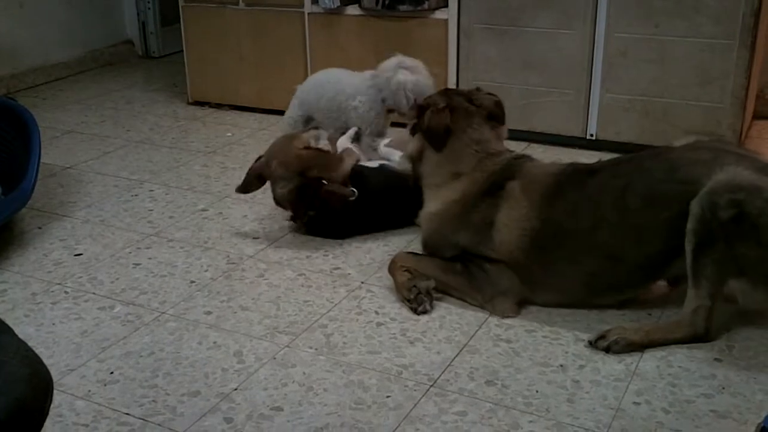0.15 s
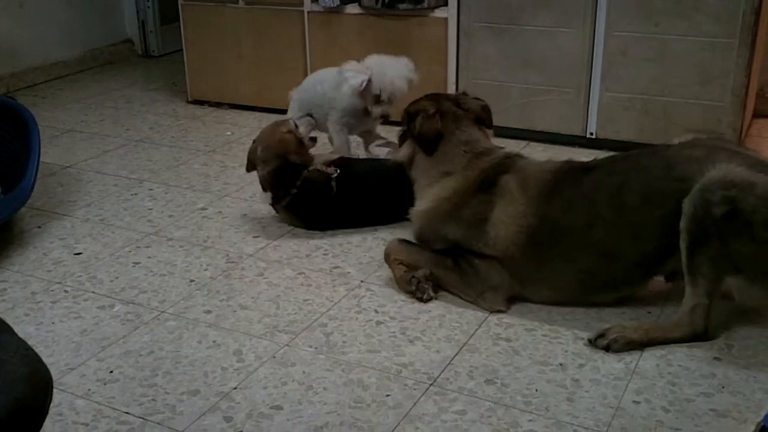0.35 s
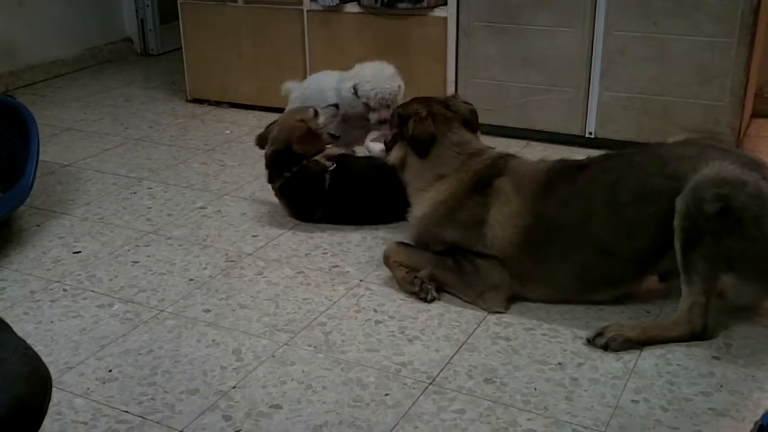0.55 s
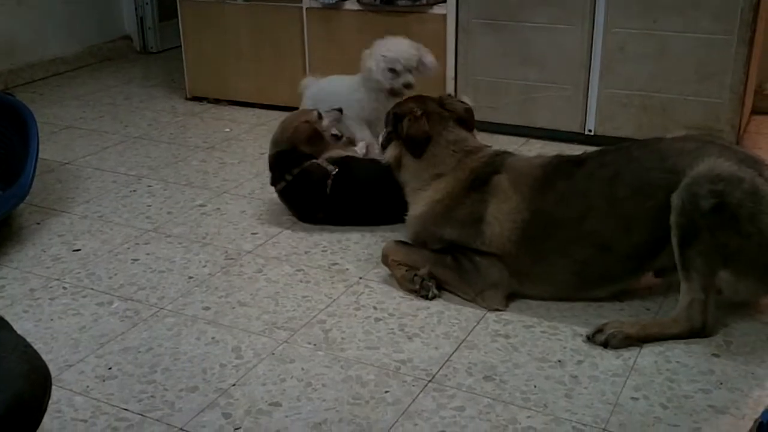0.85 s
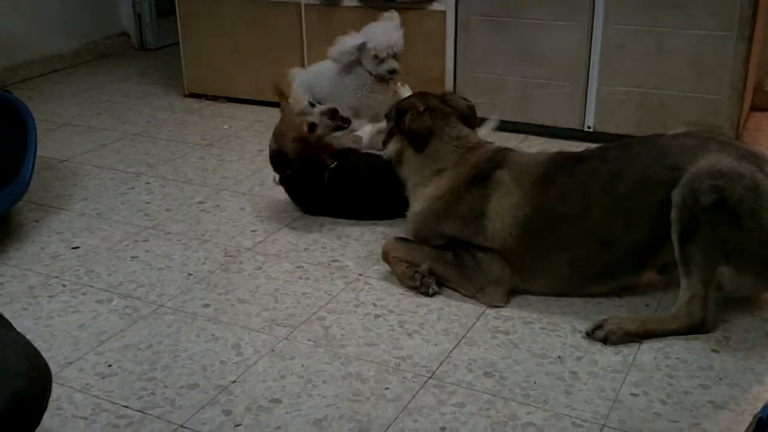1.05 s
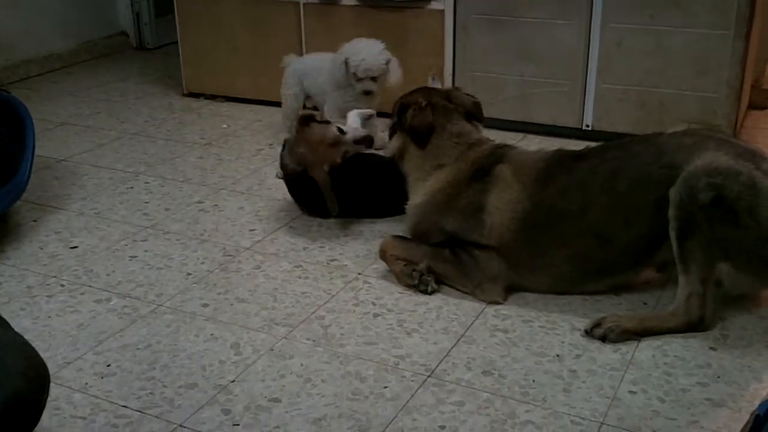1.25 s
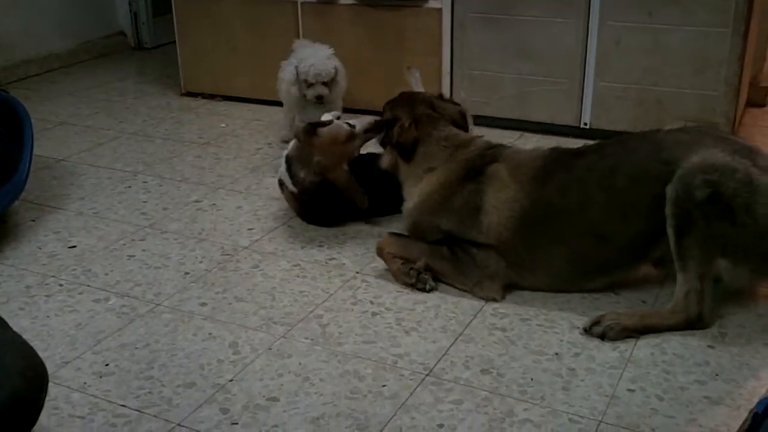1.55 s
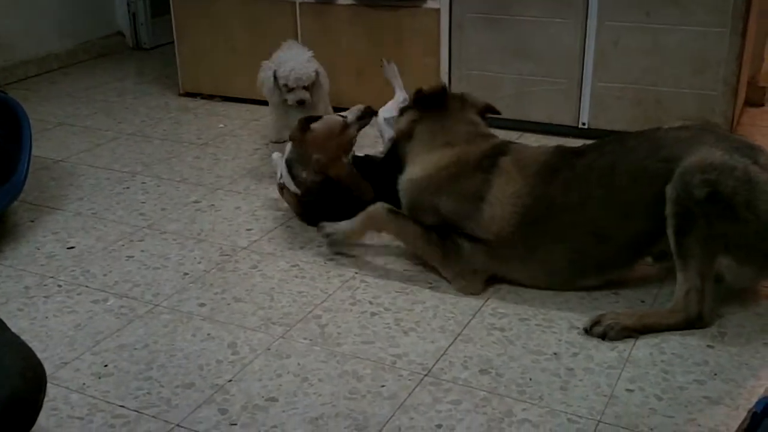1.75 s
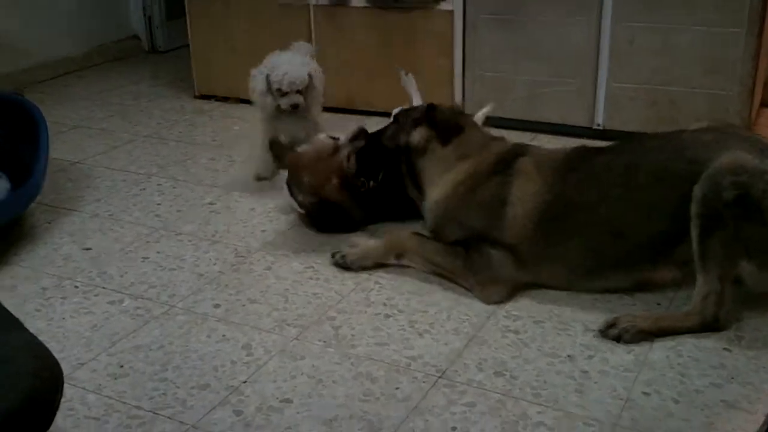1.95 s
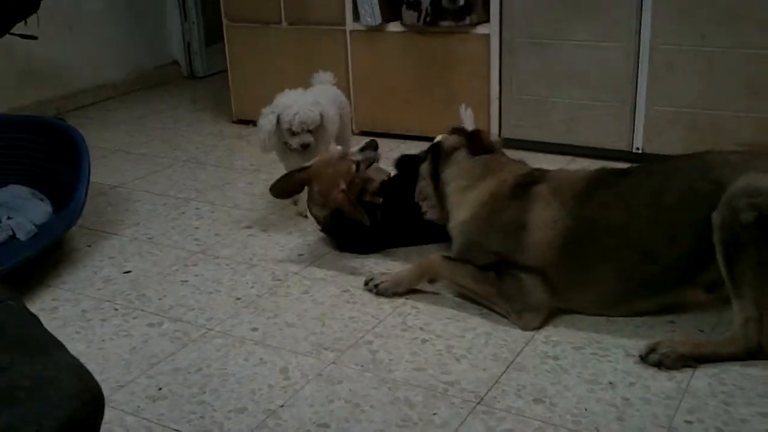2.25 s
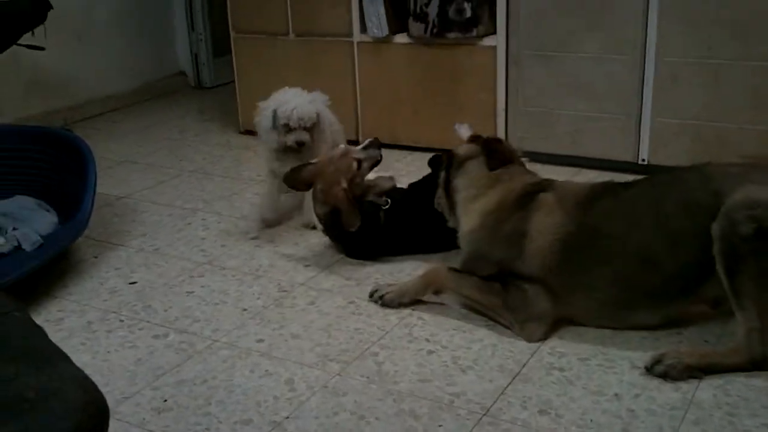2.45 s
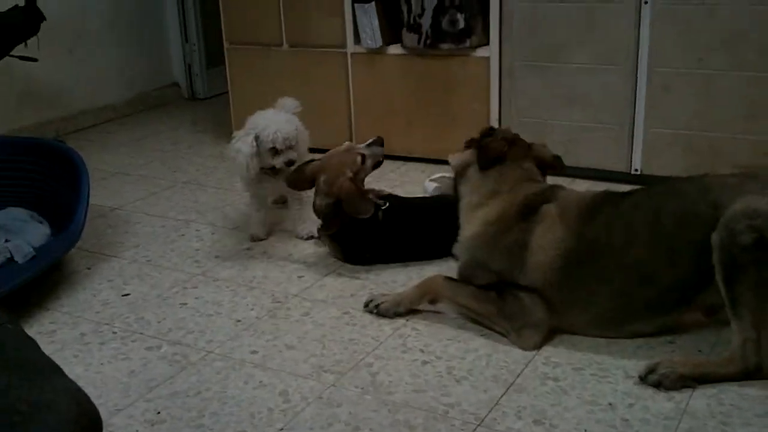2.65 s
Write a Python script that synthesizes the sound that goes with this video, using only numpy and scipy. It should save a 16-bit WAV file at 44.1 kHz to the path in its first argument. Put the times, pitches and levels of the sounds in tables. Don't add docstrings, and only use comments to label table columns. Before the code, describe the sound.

A metal collar tag jingles and claws tick as dogs wrestle, then a rumbling growl rises and a shorter, higher growl ends in a snort; small hard room, close hand-held microphone with rumble and faint hiss.

```python
import sys
import numpy as np
from scipy import signal
from scipy.fft import rfft, irfft, next_fast_len
from scipy.io import wavfile
from scipy.ndimage import uniform_filter1d, map_coordinates

SR = 44100
rng = np.random.default_rng(int(sys.argv[2]) if len(sys.argv) > 2 else 0)


def elevation(decibels):
    levels = np.asarray(decibels, float)
    return 10 ** (levels / 20)


def put_to_file(sound):
    columns = np.atleast_2d(sound).T
    safe = np.clip(columns, -1, 1)
    whole_steps = np.round(safe * 32767)
    wavfile.write(sys.argv[1], SR, whole_steps.astype(np.int16))


N = 123479
T = np.arange(N) / SR
SHORT = np.arange(SR // 5) / SR


def unit(x):
    return x / np.sqrt(np.mean(x ** 2) + 1e-20)


def along(points, hz):
    f, v = np.transpose(points)
    return np.interp(np.log(hz + 1), np.log(f + 1), v)


def wobble(rate_hz):
    knots = rng.standard_normal(int(N * rate_hz / SR) + 4)
    return map_coordinates(knots, [T * rate_hz])


def filtered(x, response):
    m = next_fast_len(N + SR // 2)
    return irfft(rfft(x, m) * response(np.fft.rfftfreq(m, 1 / SR)), m)[:N]


def coloured(x, spectrum):
    return filtered(x, lambda hz: elevation(along(spectrum, hz)))


def noise(spectrum):
    lowest_hz = spectrum[0][0] / 2
    return unit(filtered(rng.standard_normal(N), lambda hz: elevation(along(spectrum, hz)) * (hz > lowest_hz)))


def swell(start_s, length_s, power):
    return np.sin(np.pi * np.clip((T - start_s) / length_s, 0, 1) ** power)


def add(out, start_s, piece):
    out[round(start_s * SR):][:len(piece)] += piece


def room(x, wet_db):
    # hz, t60_s
    decay = [(150, 0.24), (800, 0.31), (4000, 0.35), (12000, 0.18)]
    hz, t, z = signal.stft(rng.standard_normal(SR // 2), SR, nperseg=256)
    tail = signal.istft(z * elevation(-60 * t / along(decay, hz)[:, None]), SR, nperseg=256)[1]
    delayed = np.pad(x, (200, 0))
    return x + elevation(wet_db) * signal.fftconvolve(delayed, tail / np.linalg.norm(tail))[:N]


def air():
    # hz, level_db
    spectrum = [(100, -5), (250, -7.5), (500, -8.5), (900, -7), (2000, -15), (4500, -21), (9000, -26.5),
                (15000, -26)]
    level_db, patch_db = -50.5, 1.08
    z = signal.stft(noise(spectrum), nperseg=512)[2]
    patches = uniform_filter1d(uniform_filter1d(rng.standard_normal(z.shape), 8, 0), 12, 1)
    hiss = signal.istft(z * elevation(patch_db * unit(patches)), nperseg=512)[1][:N]
    return elevation(level_db) * unit(hiss)


def handling():
    # time_s, level_db
    bumps = [
        (0, -31),
        (.3, -40),
        (.5, -41.5),
        (.7, -38),
        (1.2, -38.5),
        (1.55, -37),
        (1.72, -31),
        (2.1, -38.5),
        (2.56, -34),
        (2.72, -41.5),
    ]
    # hz, level_db
    rumble = [(15, -8), (22, 3.5), (55, -2), (90, -8), (160, -22), (300, -30), (500, -75)]
    s, level_db = np.transpose(bumps)
    return elevation(np.interp(T, s, level_db)) * unit(elevation(2.36 * wobble(16)) * noise(rumble))


def thumps():
    # centre_s, signed_size, half_width_s, recoil_share
    landings = [(.114, -0.039, 0.008, 0.45), (0.166, -0.054, 0.0075, 0.48), (.359, 0.06, 0.001, 0.68),
                (0.369, -0.053, 0.0056, 0.64), (.552, -0.041, 0.0036, 0.43), (0.641, 0.057, 0.0048, 0.75),
                (.905, -0.074, 0.0021, 0.31), (0.917, 0.068, 0.00212, 1), (1.075, 0.054, 0.0049, 0.77),
                (1.251, -0.078, 0.0027, .7), (1.267, -0.055, 0.0061, 0.51), (1.297, -0.071, 0.00254, 1.1),
                (1.323, .2, 0.0022, 0.84), (1.588, -.065, 0.0078, 0.98), (1.804, 0.041, 0.0065, 1.14),
                (2.013, -.12, 0.003, 0.14), (2.016, -0.18, 0.0011, 0.079), (2.031, -0.11, 0.0055, .8),
                (2.158, 0.049, 0.0033, 0.56), (2.481, -0.14, 0.00146, 0.12), (2.487, -0.18, 0.0012, 0.12),
                (2.504, -0.14, 0.0044, 0.33)]
    recoil_half_widths, shape_power = 2.22, 1.57
    t = np.arange(-1700, 1900) / SR
    out = np.zeros(N)

    def lobe(u):
        return np.exp(-np.abs(u) ** shape_power)

    for s, size, half_s, recoil in landings:
        push = lobe(t / half_s) - recoil * lobe(t / half_s - recoil_half_widths)
        add(out, s + t[0], size * push)
    return out


def claws():
    # start_s, peak_db, brightness_0_1
    clicks = [
        (0.16, -56.5, 0.3),
        (0.17, -56, 0.4),
        (0.4558, -49, 0.75),
        (0.4637, -51, 0.6),
        (0.7589, -46, 0.8),
        (0.849, -51.5, 0.75),
        (0.876, -51, 0.65),
        (1.7622, -36.5, 0.56),
        (1.7738, -49, 0.8),
        (1.84, -54, 0.5),
    ]
    # hz, level_db
    dull_curve = [(1500, -25), (3000, -1.5), (4500, 3.5), (7000, -3), (15000, -20)]
    # hz, level_db
    bright_curve = [(4000, -22.5), (8000, -4.5), (12000, -2), (15000, -1)]
    gain_db, t60_s, snap = 14.5, 0.0061, 3.36
    dull, bright = np.zeros(N), np.zeros(N)
    for s, db, share in clicks:
        scrape = rng.standard_normal(len(SHORT))
        tick = elevation(db + gain_db - 60 * SHORT / t60_s) * (scrape + snap * (SHORT == 0))
        add(dull, s, (1 - share) * tick)
        add(bright, s, share * tick)
    return 2 * (coloured(dull, dull_curve) + coloured(bright, bright_curve))


def tag():
    # start_s, peak_db, high_modes_db, second_mode_db, free_ringing_s
    contacts = [(0.188, -58, -15, 5, 0.033), (0.498, -50, -15, -3, 0.029), (0.5276, -39.5, -16, -10, 0.044),
                (0.5594, -34, -10, -7, 0.04), (0.6139, -53, -15, -10, 0.014), (0.6405, -52, -15, -9, 0.018),
                (0.6889, -38.5, -21, -10, 0.018), (0.7452, -42, -10, -6, 0.013),
                (0.798, -49.5, -9, -4, 0.041), (0.828, -49, -10, -8, 0.037), (0.8977, -49, -13, 2, 0.013),
                (0.9198, -47.5, -15, -5, 0.0076), (0.9422, -54, -18, 13, .012),
                (1.0302, -39, -19, -6, 0.0091), (1.041, -37.5, -22, -12, 0.029),
                (1.075, -47, -15, -1, 0.023), (1.11, -45, -17, -8, 0.014),
                (1.1428, -38.5, -11.5, -4, 0.039), (1.1937, -42.5, -15, -10, 0.04),
                (1.237, -45.5, -27, -14, 0.0088), (1.27, -62, -27, -7, 0.035), (1.346, -55, -27, -3, 0.058),
                (1.3874, -57, -27, -10, 0.013)]
    mode_hz = np.array([4635, 4935, 4540, 11250, 11995, 12075])[:, None]
    mode_db = np.array([1, -0.5, -4.5, -1, -3, 1])[:, None]
    mode_t60_s = np.array([0.22, 0.11, 0.05, .15, 0.17, 0.32])[:, None]
    # hz, level_db
    tick_curve = [(3500, -23), (5500, 1), (7000, -7.5), (9000, -20)]
    gain_db, scatter_db, attack_s, fur_t60_s = -1, 1, 0.0025, 0.019
    tick_db, tick_t60_s, chatter_db = -6.5, 0.059, 2
    modes = len(mode_hz)
    ring = elevation(mode_db - 60 * SHORT / mode_t60_s) * np.exp(2j * np.pi * mode_hz * SHORT)
    ring = ring * (1 - np.exp(-SHORT / attack_s))
    out, ticks = np.zeros(N), np.zeros(N)
    for s, db, high_db, second_db, free_s in contacts:
        share_db = np.array([0, second_db, 0, high_db, high_db, high_db])
        strike_db = db + gain_db + share_db + rng.normal(0, scatter_db, modes)
        strike = elevation(strike_db) * np.exp(2j * np.pi * rng.random(modes))
        damping = elevation(-60 * np.clip(SHORT - free_s, 0, 1) / fur_t60_s)
        add(out, s, (strike @ ring).real * damping)
        add(ticks, s, elevation(db + tick_db - 60 * SHORT / tick_t60_s))
    return out * elevation(chatter_db * wobble(150)) + ticks * noise(tick_curve)


def throat(x, peaks):
    floor_hz = 226

    def response(f):
        total = 0
        for k, (centre, width, db) in enumerate(peaks):
            peak = 1j * f * width / (centre * centre - f * f + 1j * f * width)
            total = total + (-1) ** k * elevation(db) * peak
        return (1j * f / (floor_hz + 1j * f)) ** 2 * total

    return unit(filtered(x, response))


def wheezes():
    # start_s, length_s, level_db, cavity_hz, width_hz
    breaths = [(0.271, 0.087, -47, 4500, 900), (1.0, 0.096, -53, 750, 220), (1.3, 0.14, -47, 1094, 30),
               (1.84, 0.041, -57.5, 4600, 400), (2.65, 0.072, -52, 720, 200), (1.62, .035, -55, 3400, 150),
               (1.658, 0.042, -56, 3750, 220), (1.66, 0.079, -50, 1500, 130),
               (1.765, 0.056, -54.5, 4700, 640), (1.94, 0.027, -62, 3200, 166),
               (1.933, 0.043, -53, 1750, 130), (1.945, 0.034, -34, 1080, 86), (2.386, 0.058, -41, 1870, 92),
               (2.375, 0.093, -48, 3070, 300), (2.39, 0.064, -51, 4500, 460), (2.25, 0.26, -57, 6200, 940),
               (2.25, 0.091, -48, 2180, 150), (2.649, 0.065, -57, 2200, 200),
               (2.638, 0.063, -64, 4300, 740)]
    breath = rng.standard_normal(N) * elevation(2.0 * wobble(60))
    out = np.zeros(N)
    for s, length_s, db, hz, width_hz in breaths:
        out += elevation(db) * swell(s, length_s, 0.73) * throat(breath, [(hz, width_hz, 0)])
    return out


def snorts():
    # start_s, length_s, level_db, brightness_0_1
    puffs = [
        (0.158, 0.039, -71, .6),
        (0.227, 0.13, -44.5, 1),
        (0.344, 0.066, -54.5, 1),
        (0.762, 0.039, -55.5, 0.03),
        (0.993, 0.1, -56.5, 0.03),
        (1.59, 0.085, -50, 0.3),
        (1.948, 0.015, -51, 0),
        (2.38, 0.1, -38, 0.12),
        (2.63, 0.097, -51.5, 0),
    ]
    # hz, level_db
    dull_curve = [(400, -26), (900, 6.5), (2000, 1), (4000, -12.5), (8000, -40), (15000, -44)]
    # hz, level_db
    bright_curve = [(800, -29), (2000, 6.5), (4200, 9), (7000, 6), (11000, 7), (15000, -2)]
    dull, bright, out = noise(dull_curve), noise(bright_curve), np.zeros(N)
    for s, length_s, db, share in puffs:
        out += elevation(db) * swell(s, length_s, 0.93) * ((1 - share) * dull + share * bright)
    return out * elevation(2.2 * wobble(70))


def growl(rows, chest_db, support, shut, wide):
    # hz, level_db
    rasp_curve = [(1000, -32), (1800, 4), (3600, -19), (6500, -13), (15000, -21)]
    jitter, size_scatter_db, open_share, fade_s = 0.05, 1, 1, 0.0061
    rasp_db, chest_follows = -21, 0.37
    s, *columns = np.transpose(rows)
    pitch_hz, level_db, rough, opening = [np.interp(T, s, c) for c in columns]

    turns = np.cumsum(pitch_hz * (1 + jitter * rough * wobble(60))) / SR
    cycle = turns.astype(int)
    size = elevation(size_scatter_db * rng.standard_normal(size=400))[cycle]
    pulses = unit(size * np.diff(cycle, prepend=0))
    gated = unit(size * (0.43 + np.exp(-(turns % 1) / open_share)) * rng.standard_normal(N))
    source = np.sqrt(1 - rough) * pulses + np.sqrt(rough) * gated

    voice = (1 - opening) * throat(source, shut) + opening * throat(source, wide)
    rasp = unit(coloured(gated + rng.standard_normal(N), rasp_curve))
    voice = voice + elevation(rasp_db) * rasp

    chest = np.zeros(N)
    for k, db in enumerate(chest_db):
        tone = np.sin(2 * np.pi * ((k + 1) * turns + rng.random()))
        chest += elevation(db + 3.3 * wobble(25.14)) * tone
    steadying_db = (1 - chest_follows) * (level_db.max() - level_db)
    chest = chest * elevation(steadying_db + np.interp(T, *np.transpose(support)))

    gate = np.clip(np.minimum(T - s[0], s[-1] - T) / fade_s, 0, 1)
    return gate * elevation(level_db) * (voice + chest)


def long_growl():
    # time_s, pitch_hz, level_db, roughness_0_1, mouth_opening_0_1
    course = [
        (1.29, 55.9, -48, 0.63, 0.84),
        (1.35, 58.58, -37, 0.42, 0.48),
        (1.46, 65.31, -34.5, 0.44, 0.48),
        (1.56, 68.04, -38, 0.53, 0.13),
        (1.65, 75.47, -35, 0.48, 0),
        (1.74, 74.38, -36.5, .3, 0.61),
        (1.81, 73.5, -45.5, 0.31, 0.26),
        (1.92, 72.67, -33.5, 0.22, 0.47),
        (2.0, 75.2, -47, 0.74, 0.25),
    ]
    chest_db = [-13, -5, -8.5]
    # time_s, gain_db
    support = [(1.3, -1), (1.551, -2), (1.65, 1), (1.95, -2)]
    # centre_hz, width_hz, level_db
    shut = [(307, 150, -4), (493, 102, 2), (674, 105, 2), (1013, 96, -1.5), (1568, 160, -9.5)]
    # centre_hz, width_hz, level_db
    wide = [(313, 80, -21), (480, 46, -3.5), (673, 25, 9.5), (1220, 62, -17), (1310, 97, -25),
            (2420, 150, -17.5)]
    return growl(course, chest_db, support, shut, wide)


def short_growl():
    # time_s, pitch_hz, level_db, roughness_0_1, mouth_opening_0_1
    course = [
        (2.21, 90.75, -41, .3, 0.25),
        (2.24, 89.45, -35.5, 0.34, 0.28),
        (2.27, 84.45, -34, 0.47, 0.84),
        (2.305, 83.24, -30, 0.5, 0.77),
        (2.335, 84.1, -31.5, 0.43, 0.67),
        (2.37, 82.4, -23.5, 0.28, 0.98),
        (2.4, 83.34, -36.5, 0.3, 0.83),
        (2.47, 82, -60, 0.27, 1),
    ]
    chest_db = [-10, -12, -28, -19]
    # time_s, gain_db
    support = [(2.21, -1), (2.25, -6.5), (2.3, 1), (2.4, 2.8), (2.46, -2)]
    # centre_hz, width_hz, level_db
    shut = [(330, 100, -27), (551, 70, 5.5), (698, 80, 2.5), (1027, 50, -13), (1370, 130, -10.5),
            (2310, 85, -12.5)]
    # centre_hz, width_hz, level_db
    wide = [(330, 52, -11.5), (494, 45, -3.5), (674, 26.6, 11), (1047, 92, -9), (1166, 65, -9.5),
            (1430, 106, -13), (2300, 100, -19)]
    return growl(course, chest_db, support, shut, wide)


def scene():
    background = air() + handling() + thumps()
    contacts = room(claws(), wet_db=0.6) + room(tag(), wet_db=-4.5)
    breath = room(wheezes() + snorts(), wet_db=-3)
    growls = room(long_growl() + short_growl(), wet_db=-4)
    return (background + contacts + breath + growls)[None]


def microphone(x):
    # hz, gain_db
    colour = [(20, 1), (4800, 0.5), (5300, -6.5), (6300, -6), (8000, -9.5), (10000, -11.5), (15000, -14.5)]
    # centre_hz, width_hz, depth_db
    notches = [(2697, 370, -49), (5480, 366, -29), (7855, 1630, -18.5), (10800, 370, -26)]
    top_hz, top_db_per_hz = 15250, 0.06

    def response(hz):
        gain = elevation(along(colour, hz) - top_db_per_hz * np.clip(hz - top_hz, 0, 600))
        for centre, width, db in notches:
            off = (hz - centre) ** 2
            gain = gain * np.sqrt((off + (elevation(db) * width) ** 2) / (off + width * width))
        return gain

    return filtered(x, response)


def top_cut(x):
    return signal.sosfilt(signal.butter(12, 15660, fs=SR, output="sos"), x)


def record(dry):
    mix = microphone(dry[0])[None]
    return top_cut(mix)


dry = scene()
out = record(dry)
put_to_file(out)
```